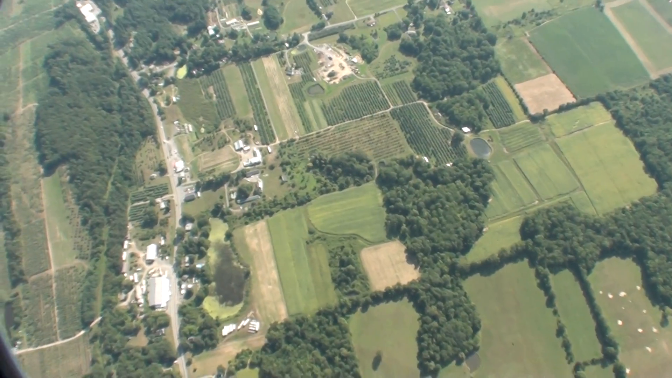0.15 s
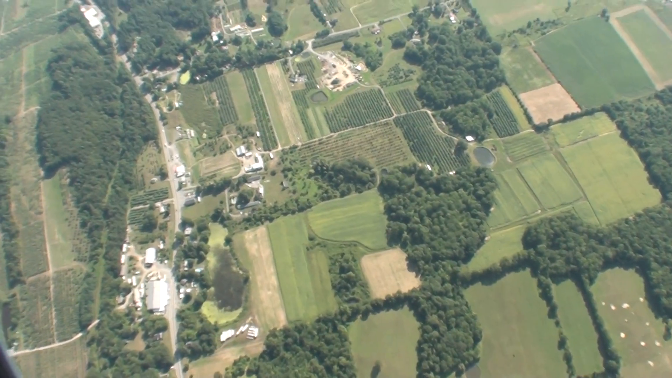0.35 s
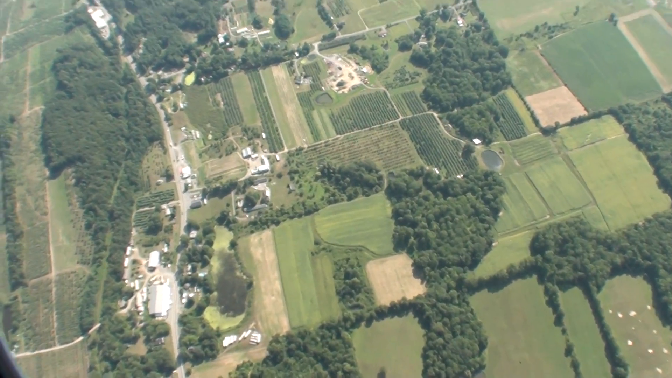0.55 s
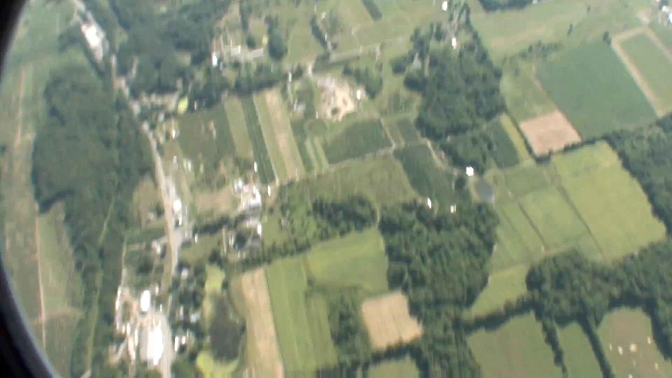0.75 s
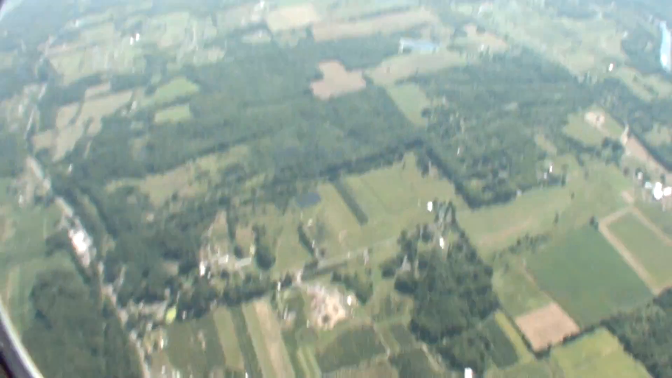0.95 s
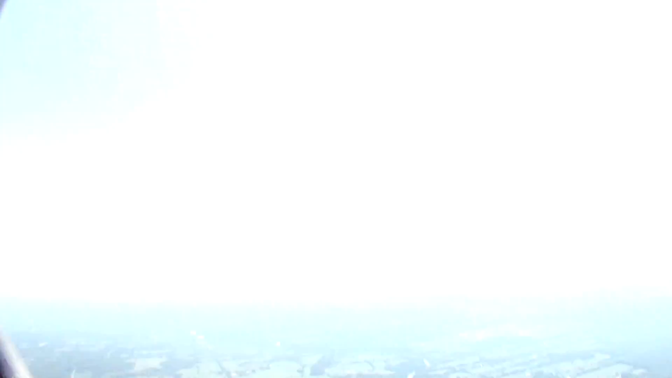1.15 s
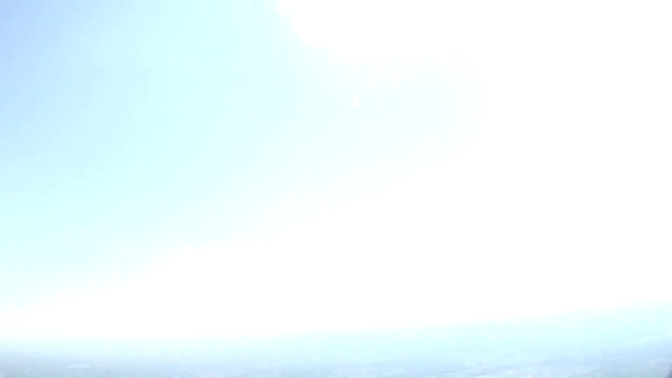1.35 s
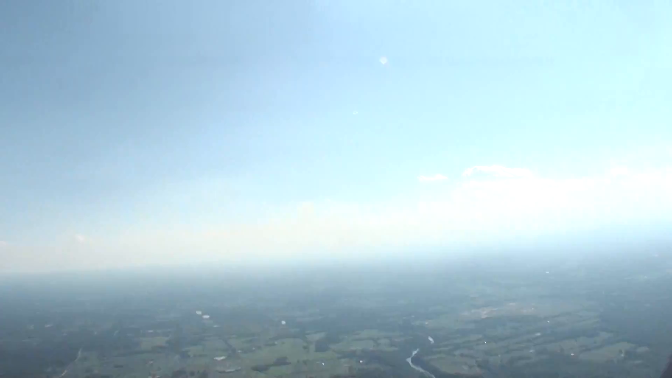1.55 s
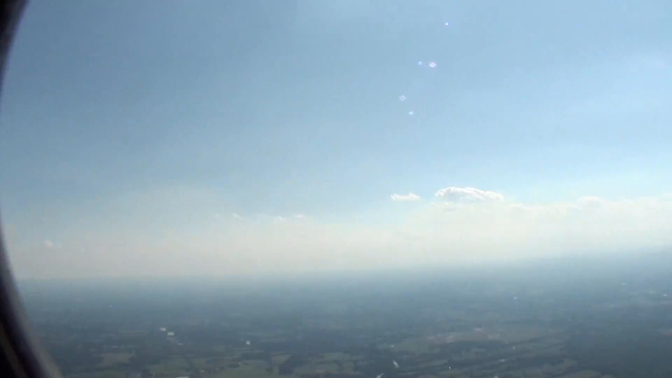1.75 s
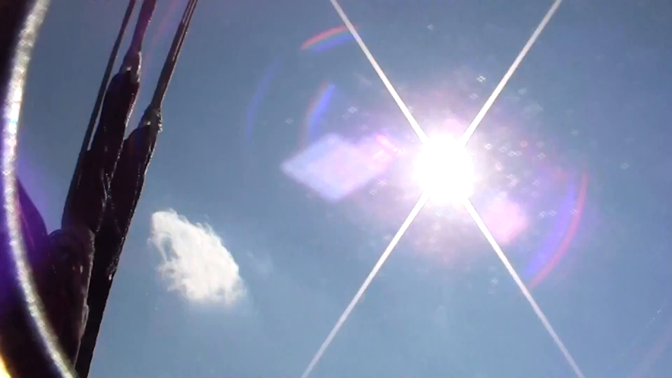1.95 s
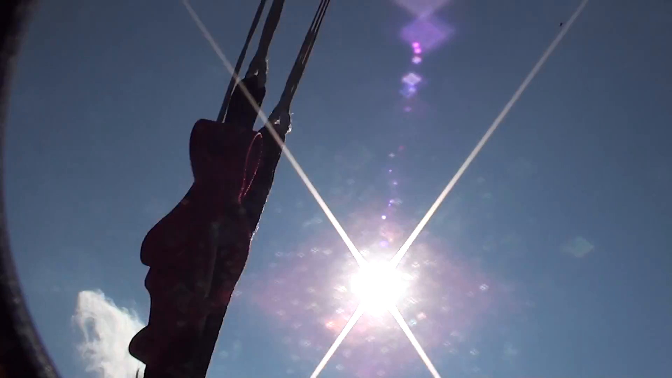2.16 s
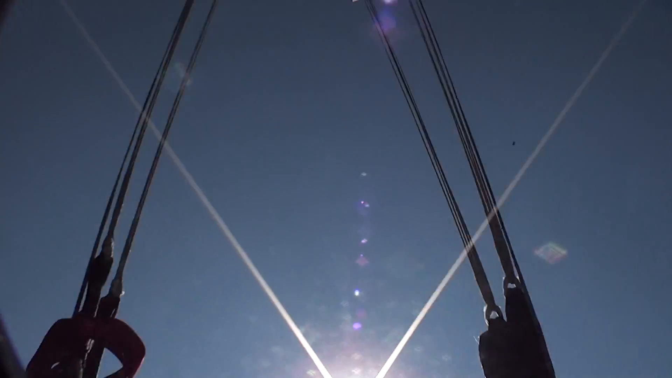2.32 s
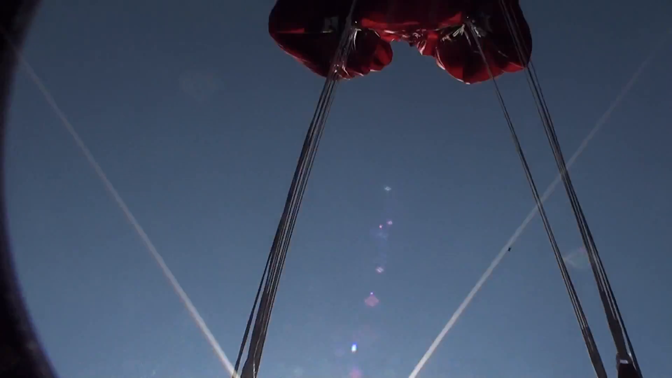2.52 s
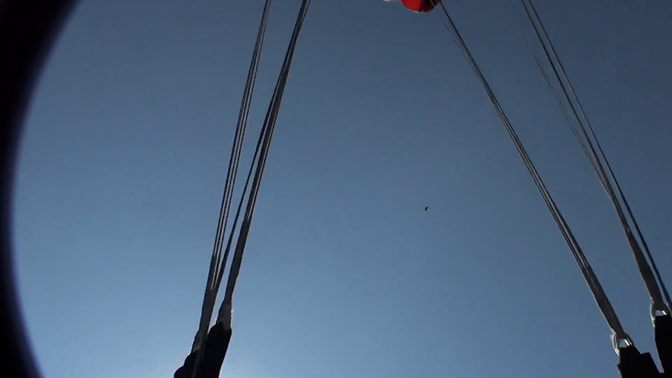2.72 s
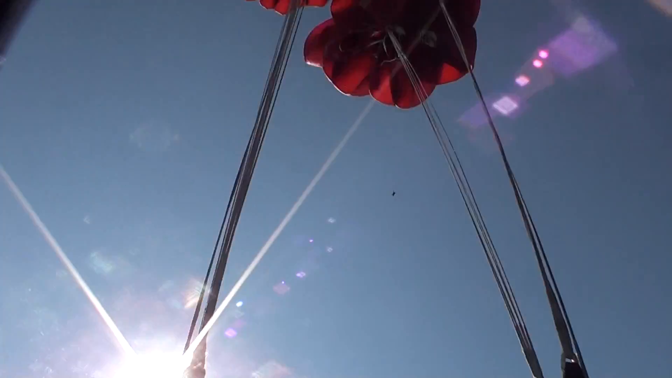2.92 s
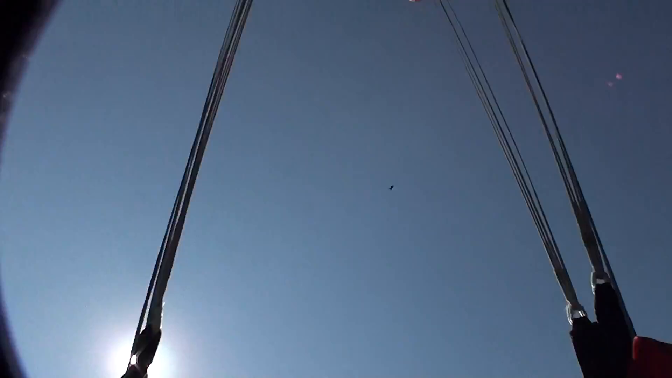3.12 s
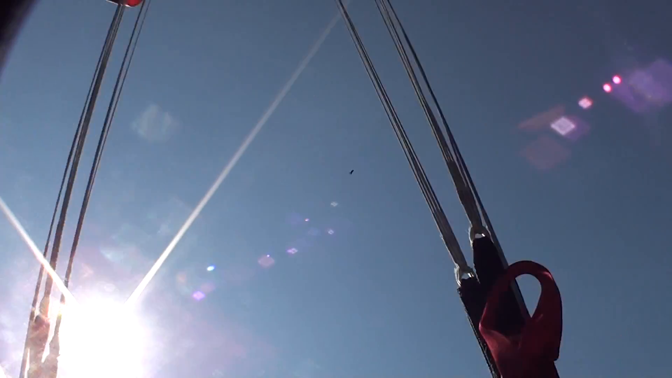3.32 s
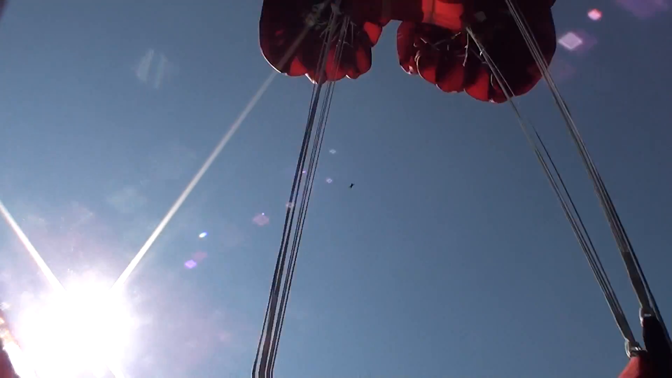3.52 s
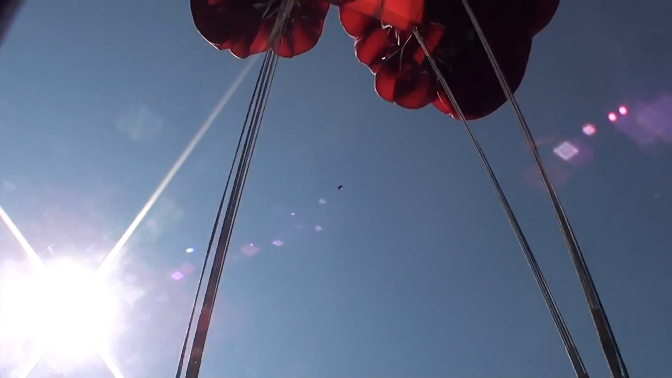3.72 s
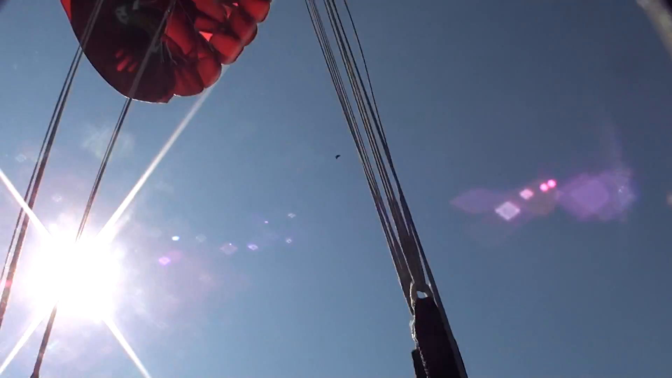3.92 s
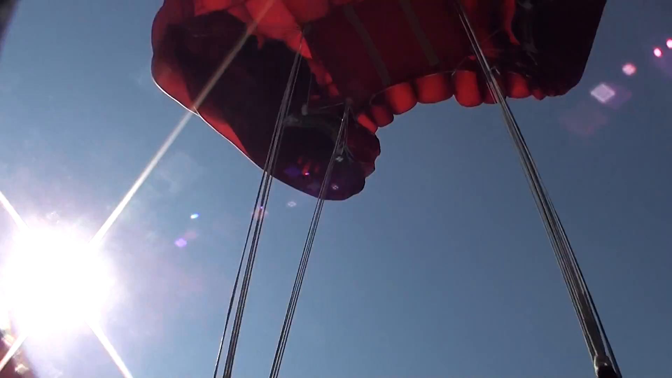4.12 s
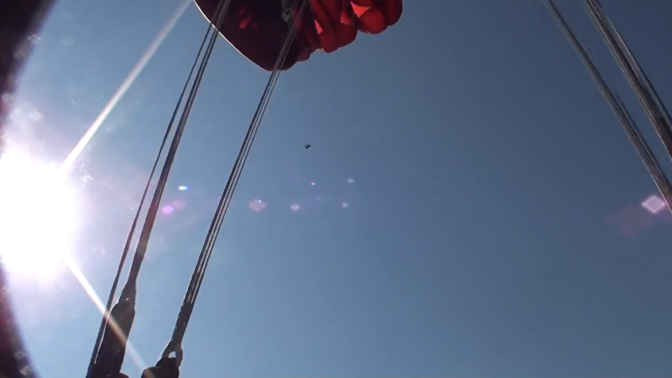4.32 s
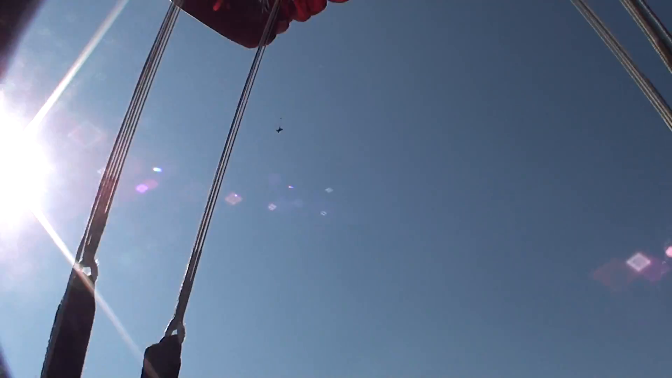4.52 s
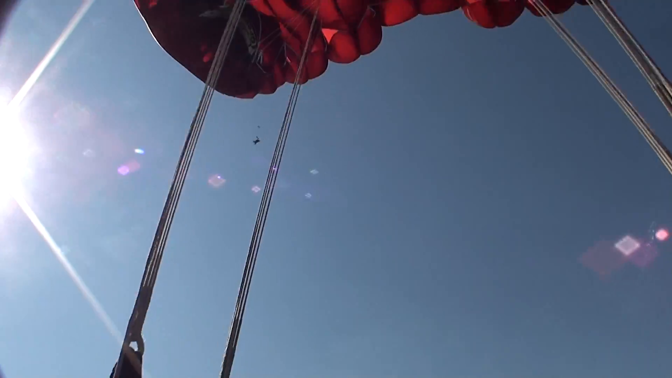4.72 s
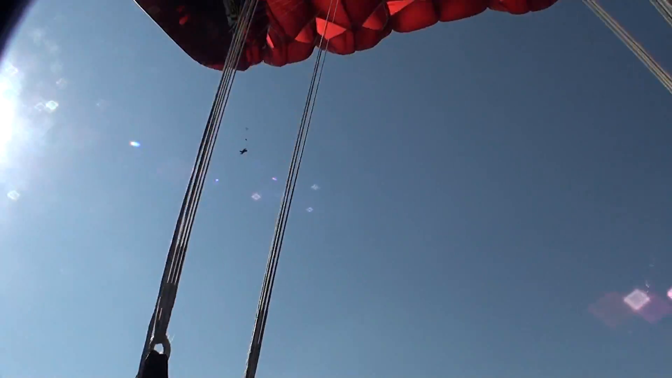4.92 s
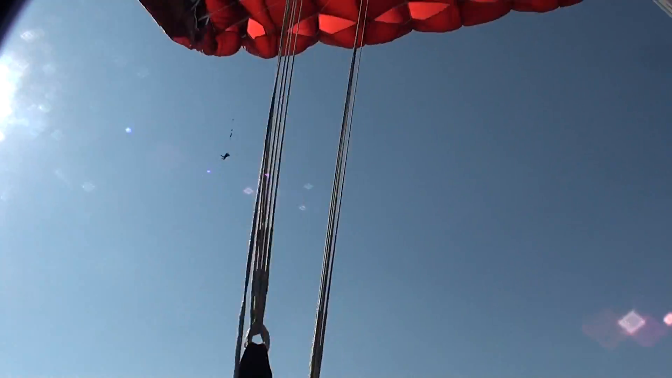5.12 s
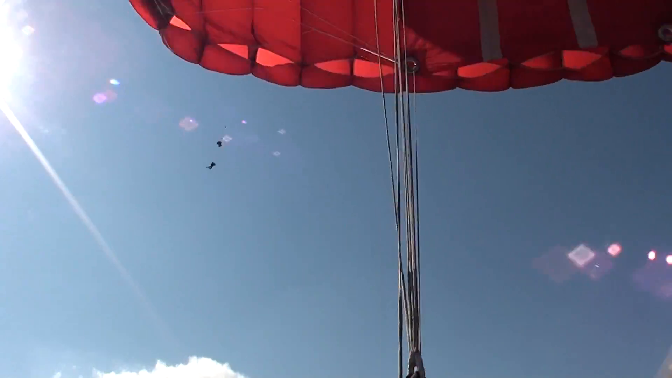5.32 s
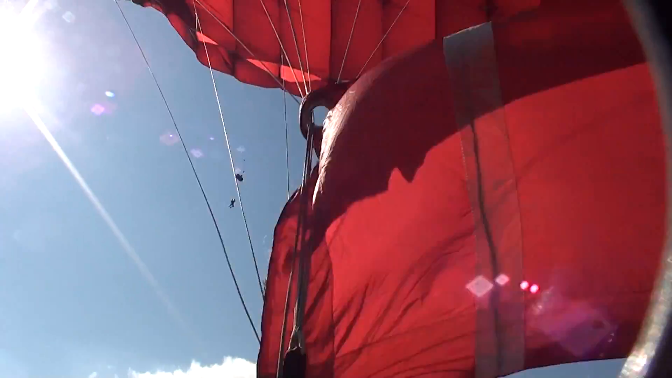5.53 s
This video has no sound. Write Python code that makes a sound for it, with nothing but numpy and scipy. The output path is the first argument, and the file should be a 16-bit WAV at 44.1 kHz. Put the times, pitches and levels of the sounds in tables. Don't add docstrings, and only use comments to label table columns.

```python
import sys
import numpy as np
from scipy import signal
from scipy.fft import rfft, irfft, next_fast_len
from scipy.io import wavfile
from scipy.ndimage import uniform_filter1d, map_coordinates

SR = 44100
rng = np.random.default_rng(int(sys.argv[2]) if len(sys.argv) > 2 else 0)


def file_out(sig):
    cols = np.atleast_2d(sig).T
    lim = np.clip(cols, -1, 1)
    pcm = np.round(lim * 32767).astype(np.int16)
    wavfile.write(sys.argv[1], SR, pcm)


def voltage_ratio(decibels):
    exponent = np.asarray(decibels, float) / 20
    return 10 ** exponent


N = 245637
RIGHT = np.array([[-1], [1]])

# time in seconds, turbulence on the ports in dB, rush of passing air and cloth in dB.
AIRFLOW = [(0.0, -13.5, -23), (0.59, -13.5, -28), (0.88, -14.5, -49), (1.12, -15.5, -29),
           (1.41, -19, -28.5), (1.72, -18, -32), (1.99, -27.5, -34.5), (2.26, -29.5, -36.5),
           (2.45, -25, -37.5), (2.8, -27, -40.5), (3.72, -30, -37), (3.9, -30.5, -37.5), (4.1, -27, -33.5),
           (4.4, -36.5, -40.5), (4.82, -36.5, -42.5), (5.24, -40.5, -43.5), (5.57, -36.5, -38.5)]
# middle in seconds, swell or lull in dB, half length in seconds.
WAKE_SWINGS = [(1.069, -2, .005), (1.099, -2, .007), (1.118, -10, 0.004), (1.147, -6, .006), (4.2, 1, .02),
               (5.38, 0, .015), (5.5, 1, .02), (1.183, 0.5, 0.016), (1.259, -5.5, 0.018),
               (1.331, -8, 0.016), (1.483, -4, 0.017), (1.57, -1, 0.049), (1.608, -2, 0.0053),
               (1.664, -1, .025), (1.699, -10, 0.006), (1.76, -2, .012), (1.822, -10, .005),
               (1.86, 4, 0.034), (1.977, -5, 0.023), (2.034, -2.5, .012), (2.177, 6.5, 0.015),
               (2.25, 0, .03), (2.52, 2, 0.053), (2.59, -0.5, 0.023), (2.68, 3.5, 0.06), (2.763, 2, 0.015),
               (2.86, -1.5, .025), (2.983, -0.5, 0.031), (3.041, 5, 0.011), (3.12, -1.5, 0.045),
               (3.197, -0.5, 0.016), (3.38, 0, 0.023), (3.494, 0.5, 0.015), (3.64, -2, 0.03),
               (3.79, -3.5, 0.035), (3.985, 2.5, 0.027), (4.03, -1.5, .015), (4.098, 3, 0.074),
               (4.172, -4, 0.021), (4.24, 0.5, 0.027), (4.333, -3, 0.025), (4.408, -1, 0.017),
               (4.51, -2, 0.022), (4.614, -1.5, 0.018), (4.72, 4, 0.021), (4.854, 5.5, 0.021),
               (4.91, -3.5, 0.02), (5.007, 2, 0.028), (5.065, 4.5, 0.03), (5.2, -2, 0.062),
               (5.353, -1, 0.01), (5.447, -2, 0.034)]
# middle in seconds, level in dB, half length in seconds.
SPIT_EVENTS = [(1.059, -37, 0.002), (1.084, -40, 0.0019), (1.112, -37.7, 0.0014), (1.13, -32.5, 0.0009),
               (1.135, -29, 0.00057), (1.156, -44, 0.002), (1.161, -42, 0.0017), (1.1707, -31, 0.0013),
               (1.182, -33, 0.0034), (1.192, -40, 0.0038), (1.202, -50, 0.0016), (1.286, -42, 0.0026),
               (1.307, -40.5, 0.0025), (1.318, -35.5, 0.001), (1.405, -48, 0.003), (1.42, -44, 0.0017),
               (1.438, -35.5, 0.00098), (1.465, -45, 0.0019), (1.528, -46, 0.002), (1.545, -37.5, 0.0026),
               (1.553, -34, 0.0019), (1.562, -40.5, 0.0042), (1.57, -41, 0.0014), (1.588, -40, 0.0027),
               (1.597, -39, 0.0013), (1.603, -40, 0.0011), (1.632, -45, 0.0015), (1.641, -47, 0.0014),
               (1.6425, -38, 0.0014), (1.668, -43, 0.0024), (1.673, -45, 0.0015), (1.68, -46, 0.0017),
               (1.739, -42, 0.0025), (1.8126, -43, 0.0012), (1.844, -38, 0.001), (1.864, -42.5, 0.0034),
               (1.876, -49, 0.0058), (1.901, -46, 0.0033), (1.911, -40, 0.0014), (1.921, -44, 0.0028),
               (1.044, -33, 0.001), (1.05, -40, 0.001), (1.126, -42, 0.0012), (1.154, -40, 0.001),
               (1.212, -43, 0.001), (1.076, -41, 0.002), (1.227, -50, 0.0022), (1.259, -46, 0.0017),
               (1.356, -52, 0.0018), (1.385, -45, 0.0015), (1.424, -43, 0.0012), (1.48, -45, 0.0019),
               (1.5, -47, 0.0021), (1.511, -44, 0.002), (1.71, -52, 0.0016), (1.72, -55, 0.0017),
               (1.788, -45.5, 0.0026), (1.795, -53, 0.0011), (1.831, -45, 0.001), (1.838, -44, 0.00091)]
# middle in seconds, level in dB, half length in seconds.
FLAP_EVENTS = [(2.012, -25.5, 0.0047), (2.063, -26, 0.0044), (2.304, -26.5, 0.008), (2.431, -22.5, 0.005),
               (2.611, -28.5, 0.005), (2.692, -33, 0.0064), (2.812, -25.5, 0.0032), (2.934, -28, 0.0038),
               (2.998, -32, 0.013), (3.071, -28.5, 0.017), (3.264, -28, 0.0066), (3.353, -27, 0.0014),
               (3.395, -27.5, 0.01), (3.444, -28.5, 0.012), (3.54, -40, 0.0047), (3.604, -24, 0.0016),
               (3.691, -31, 0.007), (3.977, -30, 0.0096), (4.052, -24.5, 0.0084), (4.076, -30, 0.011),
               (4.1, -28.5, 0.012), (4.13, -29, 0.011), (4.157, -29, 0.005), (4.142, -27.5, 0.0057),
               (4.21, -28, 0.0089), (4.27, -24, 0.0064), (4.577, -29, 0.0044), (4.855, -37, 0.0084),
               (5.049, -30, 0.003), (5.266, -32, 0.009), (5.419, -25, 0.0017), (5.451, -26, 0.014),
               (5.562, -26, 0.0067)]
# middle in seconds, peak in dB.
CRACK_EVENTS = [(1.997, -33), (2.181, -28), (2.666, -29), (3.19, -25), (4.575, -35), (4.868, -28),
                (2.061, -23), (2.425, -24), (2.499, -24), (2.523, -33), (2.7926, -29), (2.8494, -31),
                (3.0717, -28), (3.2394, -30), (3.3487, -24), (3.534, -25), (4.551, -35), (4.664, -27),
                (4.9454, -31), (5.0423, -26), (5.2584, -26.5), (5.2718, -22), (5.4067, -23),
                (5.4466, -22.5), (5.5144, -28), (5.544, -19), (5.5603, -21)]
# middle in seconds, push in dB, slap over the push in dB, half length in seconds.
THUMP_EVENTS = [(1.186, -17.5, 5, 0.026), (1.316, -10.5, 2.5, 0.0041), (1.434, -14.5, -1, 0.011),
                (1.636, -23.5, 7, 0.033), (1.803, -13, -5.5, 0.017), (1.862, -13.5, -7, 0.025),
                (2.013, -12, -12, 0.0088), (2.062, -22, 5, 0.007), (2.099, -13, -19, 0.004),
                (2.866, -12, -31, 0.015), (2.431, -13, -14, 0.021), (2.502, -17.5, -2, 0.013),
                (3.958, -19.5, -24, 0.035), (2.76, -12, -22, 0.014), (2.806, -9.5, -9, 0.0051),
                (4.101, -22.5, -1, 0.056), (4.949, -21.5, -5, 0.0056), (3.077, -28.5, 13, 0.0049),
                (3.189, -17.5, -2.5, 0.0086), (3.255, -30.5, 4.5, 0.036), (3.546, -22.5, -3.5, 0.025),
                (3.726, -19, -7.5, 0.0092), (4.426, -22, -2.5, 0.015), (4.568, -31, 6, 0.014),
                (4.667, -26.5, -1.5, 0.01), (4.787, -18.5, -13, 0.0047), (4.868, -22, -1.5, 0.0081),
                (5.148, -26, -4.5, 0.014), (5.329, -17.5, -18, 0.0034), (5.458, -22, -1, 0.005)]
# onset in seconds, peak in dB, left over right in dB.
KNOCK_EVENTS = [(1.995, -18, -1.5), (2.156, -18, 0.0), (2.217, -15, 1), (2.524, -15, 0.5),
                (2.608, -15, -2.0), (2.664, -18, 2.0), (2.74, -18, -3.0), (2.791, -8, -2),
                (2.848, -16, 0.0), (2.99, -22, 1.0), (3.107, -21, 1.5), (3.164, -21, -4.0),
                (3.207, -13, 1.0), (3.239, -18, 2), (3.312, -24, -1.5), (3.347, -17, -2.5),
                (3.395, -17, -2), (3.482, -20, -3), (3.752, -18, -2.5), (3.806, -24, 2), (3.886, -27, -2.5),
                (4.221, -14, 1.0), (4.298, -21, -0.5), (4.551, -23, -4.5), (4.715, -23, 0.5),
                (4.82, -25, -3.0), (4.92, -26, -4), (4.989, -29, -3.0), (5.041, -28, -3.0),
                (5.084, -23, -2.5), (5.364, -26, -0.5), (5.413, -30, -2.0), (5.505, -28, -3.0),
                (5.541, -22, -4)]
# start in seconds, end in seconds, pitch in Hz, level in dB.
VORTEX_STREETS = [
    (-.02, .84, 338, -22.5),
    (-.02, .8, 540, -21.5),
    (.84, .98, 820, -22),
    (.88, 1.055, 1250, -24),
    (.96, 1.055, 950, -25),
    (.95, 1.2, 450, -23),
    (1.2, 1.97, 168.8, -22),
    (1.2, 1.93, 419.5, -28.5),
]

# frequency in Hz, level in dB per Hz.
SWAY_COLOUR = [(10, -29), (30, -27), (55, 3), (90, 5), (200, -46), (600, -110)]
BUFFET_COLOUR = [(15, -46), (35, -30), (70, -1), (110, 6), (180, 3), (300, -9.5), (600, -42), (2000, -110)]
EDDY_COLOUR = [(100, -19), (200, 0), (300, 2), (420, 0), (680, -0.5), (850, -9), (1200, -17), (3000, -44),
               (8000, -110)]
LEE_COLOUR = [(100, -9), (200, -1), (300, -2), (420, -3), (680, -6.5), (900, -13), (1300, -28), (3000, -53),
              (8000, -110)]
RUSH_COLOUR = [(400, -9), (800, -6), (1100, 3.5), (1700, 1), (2600, 0), (3550, -4.5), (4200, -16),
               (6000, -48), (9000, -110)]
FIZZ_COLOUR = [(2500, -17), (4000, -2), (5000, -2), (6300, -1), (8000, -9.5), (10000, -22), (12000, -32),
               (16000, -46)]
ROAR_COLOUR = [(400, -21.5), (750, 2.5), (1100, -2.5), (1700, -6), (2600, -12.5), (4000, -19), (7000, -28),
               (11000, -37.5), (16000, -45)]
WHISTLE_COLOUR = [(2500, -1.5), (4500, 0), (7000, 2), (9500, -3.5), (13000, -12), (16000, -15.5)]
SPIT_COLOUR = [(2500, -28), (4000, 3), (7000, -1.5), (11000, -15.5), (16000, -24)]
GRIT_COLOUR = [(500, 2.5), (900, 4.5), (2000, -5), (3500, -13.5), (5000, -30), (10000, -100)]
FLAP_COLOUR = [(700, -7), (1300, 12), (2600, 11.5), (3600, 5), (4500, -18), (9000, -100)]
SNAP_COLOUR = [(3500, -3), (5000, -2), (6500, -2), (9000, -12), (12000, -31), (16000, -31)]
PUSH_COLOUR = [(35, -19), (80, -1.5), (150, 0.5), (300, -5.5), (500, -17.5), (2000, -98)]
SLAP_COLOUR = [(180, -15.5), (350, 0.5), (700, -5), (1100, -11), (2500, -27.5), (8000, -67)]

# frequency in Hz, likeness from 0 to 1.
PORT_LIKENESS = [(60, .92), (130, .82), (300, .55), (650, .3), (1100, .42), (2000, .5), (4000, .75),
                 (8000, .92), (12000, .96), (14000, .98)]
# frequency in Hz, lead in radians.
PORT_LEAD = [(100, 0), (400, .3), (700, 1.3), (1100, 2.3), (1500, 1.8), (2100, 1.1), (4000, .65),
             (8000, .38), (14000, 0)]


def unit(x):
    return x / np.sqrt(np.mean(x ** 2) + 1e-20)


def along(points, hz):
    f, value = np.transpose(points)
    return np.interp(np.log(hz + 1), np.log(f + 1), value)


def wobble(rate):
    coarse = np.arange(0, N + 16, 16)
    knots = rng.standard_normal(int(N * 400 / SR) + 4)
    curve = map_coordinates(knots, [coarse * min(rate, 400) / SR])
    return np.interp(np.arange(N), coarse, curve)


def patches(pair, depth_db):
    z = signal.stft(pair, nperseg=512)[2]
    field = rng.standard_normal(z.shape[1:])
    field = uniform_filter1d(field, size=6, axis=0)
    field = uniform_filter1d(field, size=8, axis=1)
    return signal.istft(z * voltage_ratio(depth_db * unit(field)), nperseg=512)[1]


def air(colour, patchy_db=0, wide=1):
    pair = rng.standard_normal((2, N))
    if patchy_db:
        pair = patches(pair, patchy_db)
    m = next_fast_len(N + 8192)
    hz = np.fft.rfftfreq(m, 1 / SR)
    shared, own = rfft(pair, m) * voltage_ratio(along(colour, hz))
    turn = wide * np.arccos(along(PORT_LIKENESS, hz)) / 2
    shared, own = shared * np.cos(turn), own * np.sin(turn)
    lead = np.exp(1j * wide * along(PORT_LEAD, hz) / 2)
    return unit(irfft([(shared + own) * lead, (shared - own) / lead], m)[:, :N])


def puffs(s, db, half, pan_db, colour):
    noise = voltage_ratio(3 * wobble(300)) * air(colour)
    noise = np.pad(noise, ((0, 0), (0, SR)), "reflect")
    out = np.zeros_like(noise)
    t = np.arange(-SR // 20, SR // 20) / SR
    for at, level_db, life, side_db in zip(s, db, np.clip(half, .0004, .025), pan_db):
        span = round(at * SR) - SR // 20 + np.arange(len(t))
        shape = 1 / np.cosh(t / np.where(t < 0, 0.7 * life, life))
        puff = shape * noise[:, span]
        size = np.sqrt(np.sum(puff.mean(0) ** 2) / np.sum(shape ** 2))
        out[:, span] += voltage_ratio(level_db - RIGHT * side_db / 2) * puff / size
    return out[:, :N]


def cracks():
    s, peak_db = np.transpose(CRACK_EVENTS)
    half = np.full(len(s), .0009)
    pan_db = rng.normal(-0.5, 1.5, len(s))
    body_db = peak_db - 4.5
    body = puffs(s, body_db, half, pan_db, FLAP_COLOUR)
    return body + puffs(s, body_db - 20.5, half, .3 * pan_db, SNAP_COLOUR)


def canopy():
    s, db, half = np.transpose(FLAP_EVENTS)
    pan_db = rng.normal(-6.5, 1.8, len(s))
    snap_db = rng.normal(-18.5, 3, len(s))
    flap = puffs(s, db - 6.5, 0.93 * half, pan_db, FLAP_COLOUR)
    return flap + puffs(s, db + snap_db, 1.03 * half, 0.26 * pan_db, SNAP_COLOUR)


def housing():
    s, db, over_db, half = np.transpose(THUMP_EVENTS)
    at, peak_db, side_db = np.transpose(KNOCK_EVENTS)
    knock_half = np.full(len(at), 0.0028)
    when = np.r_[s, at + .003]
    pan_db = np.r_[np.full(len(s), -1.4), side_db]
    push_db = np.r_[db - 2.5, peak_db - 11]
    slap_db = np.r_[db + over_db - .8, peak_db - 10]
    push = puffs(when, push_db, 0.88 * np.r_[half, knock_half], 0.27 * pan_db, PUSH_COLOUR)
    return push + puffs(when, slap_db, np.r_[0.5 * half, knock_half], pan_db, SLAP_COLOUR)


def wake():
    s, db, half = np.transpose(SPIT_EVENTS)
    pan_db = rng.normal(-0.26, 4.5, len(s))
    grit_db = -19 + 0.75 * (db + 44)
    spit = puffs(s, db + 7.0, 0.76 * half, 0.73 * pan_db, SPIT_COLOUR)
    return spit + puffs(s, grit_db + 1.0, 0.87 * half, pan_db, GRIT_COLOUR)


def vortices():
    t, out = np.arange(N) / SR, np.zeros((2, N))
    slide_db = 1.6 * wobble(14) + 1.1 * wobble(120)
    fade_db = 4 * wobble(35.02) + 2.5 * np.array([wobble(44.85), wobble(44.85)])
    for (start, end, hz, db), draw in zip(VORTEX_STREETS, rng.random(len(VORTEX_STREETS))):
        on = np.flatnonzero((t > start) & (t < end))
        own = (on + int(draw * N)) % N
        phase = 2 * np.pi * np.cumsum(hz * voltage_ratio(slide_db[own])) / SR
        gate = np.clip(np.minimum(t[on] - start, end - t[on]) / .02, 0, 1)
        tone = np.sin(phase - RIGHT * along(PORT_LEAD, hz) / 2)
        out[:, on] += gate * voltage_ratio(db + fade_db[:, own]) * tone
    return out


def flow(t):
    at, turbulence_db, rush_db = np.transpose(AIRFLOW)
    return np.interp(t, at, turbulence_db), np.interp(t, at, rush_db)


def swing(t):
    s, db, half = np.transpose(WAKE_SWINGS)
    coarse = t[::64]
    away = (coarse - s[:, None]) / half[:, None]
    return np.interp(t, coarse, db @ np.exp(-away ** 4))


def fizz(fizz_db, gust):
    ripple = voltage_ratio(1.2 * gust + 0.7 * wobble(30))
    return voltage_ratio(fizz_db) * unit(ripple * air(FIZZ_COLOUR, patchy_db=1.3, wide=0.55))


def rush(t, rush_db, gust):
    aside_db = np.interp(t, [1.9, 2.1], [0, 1.6]) * RIGHT
    at_ports = voltage_ratio(np.interp(t, [1.9, 2.1], [0, -60]))
    ripple = voltage_ratio(.5 * gust + .9 * wobble(110))
    overhead = air(RUSH_COLOUR, patchy_db=0.4, wide=0.43)
    blend = at_ports * air(RUSH_COLOUR) + (1 - at_ports) * overhead
    return voltage_ratio(rush_db + 2.0 + aside_db) * ripple * blend


def buffeting(t, eddy_db, gust):
    buffet_db = eddy_db + np.interp(t, [.4, 2.5, 4.4], [-7, 6, -0.2])
    buffet = voltage_ratio(buffet_db - 0.5 + 0.33 * RIGHT) * unit(voltage_ratio(0.97 * gust) * air(BUFFET_COLOUR))
    sway_db = buffet_db + np.interp(t, [1.4, 3.1], [-18, -3])
    return buffet + voltage_ratio(sway_db) * air(SWAY_COLOUR)


def eddies(t, eddy_db, gust, broken):
    each = broken * np.array([wobble(50), wobble(50)])
    lee = np.interp(t, [1.9, 2.1], [0, np.pi / 2])
    whirl = np.cos(lee) * air(EDDY_COLOUR) + np.sin(lee) * air(LEE_COLOUR)
    return voltage_ratio(eddy_db + 3.0 + 0.45 * RIGHT) * unit(voltage_ratio(1.37 * gust + 1.46 * each) * whirl)


def after(t, s, over):
    return np.clip((t - s) / over + .5, 0, 1)


def roar(t, swing_db):
    flicker_db = .6 * wobble(40) + 1.3 * wobble(200)
    torn = np.interp(t, [1.03, 1.06], [1, 3.5])
    roar_db = -16.5 + 6 * after(t, 0.83, 0.16)
    roar_db = roar_db + (-32.5 - roar_db) * after(t, 1.057, 0.046)
    roar_db = roar_db - 45 * after(t, 1.93, .02)
    facing_db = np.interp(t, [0, .4, .83, .845], [-22.5, -22.0, -24.5, -67.5])
    whistle = voltage_ratio(facing_db + flicker_db) * air(WHISTLE_COLOUR)
    return voltage_ratio(roar_db + swing_db + torn * flicker_db) * air(ROAR_COLOUR) + whistle


def wind():
    t = np.arange(N) / SR
    turbulence_db, passing_db = flow(t)
    swing_db = swing(t)
    eddy_db = turbulence_db + swing_db
    broken = np.interp(t, [1.0, 1.08], [.3, 1])
    gust = broken * (.5 * wobble(70) + 1.2 * wobble(120))
    fine = fizz(passing_db - 12 + 0.42 * swing_db, gust) + rush(t, passing_db + 0.34 * swing_db, gust)
    return fine + buffeting(t, eddy_db, gust) + eddies(t, eddy_db, gust, broken) + roar(t, swing_db)


def scene():
    return cracks() + canopy() + housing() + wake() + vortices() + wind()


def bend(x, top, hard):
    return x / (1 + np.abs(x / top) ** hard) ** (1 / hard)


def band_limit(x):
    return signal.sosfilt(signal.butter(12, 15990, fs=SR, output="sos"), x)


def record(dry):
    mid = dry.mean(axis=0)
    eased = dry - mid + bend(mid, .8, 4.5)
    flat = bend(eased, 1.02, 13)
    m = next_fast_len(N + 8192)
    hz = np.fft.rfftfreq(m, 1 / SR)
    keep = np.clip((15980 - hz) / 250, 0, 1)
    banded = irfft(rfft(flat, m) * keep, m)[:, :N]
    return band_limit(banded)


dry = scene()
out = record(dry)
file_out(out)
```